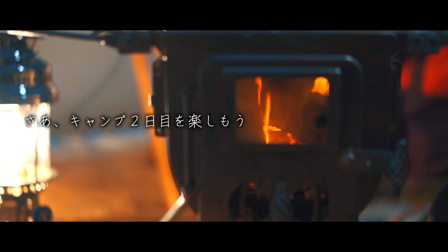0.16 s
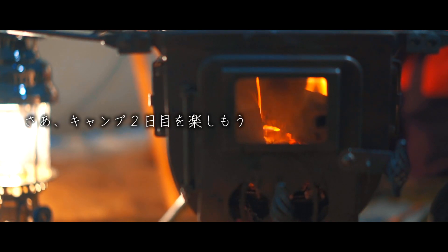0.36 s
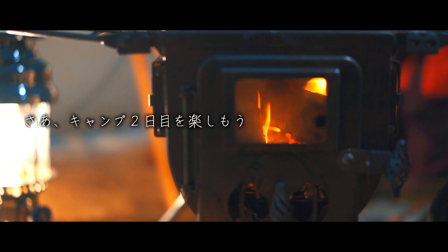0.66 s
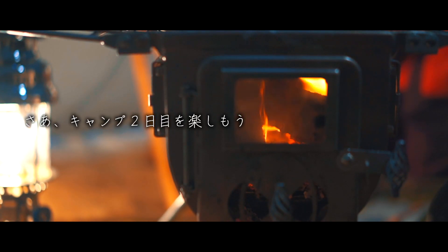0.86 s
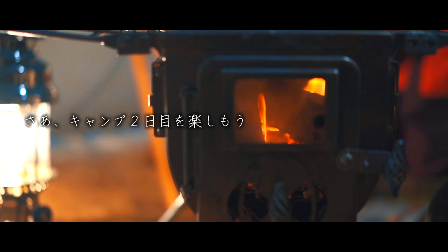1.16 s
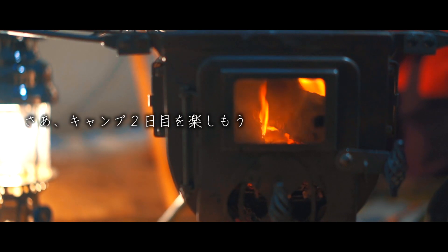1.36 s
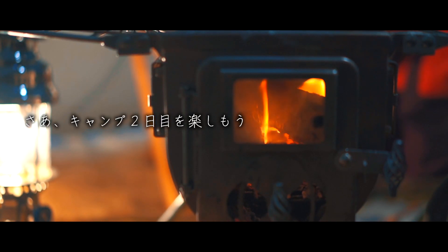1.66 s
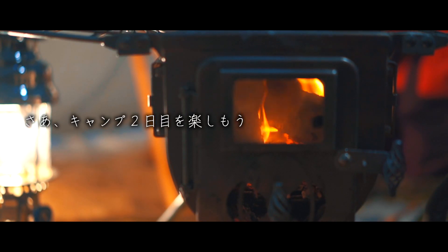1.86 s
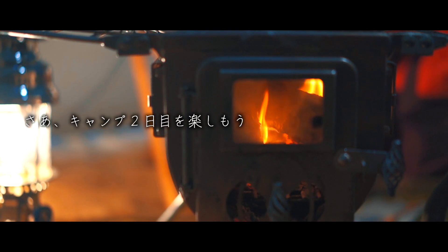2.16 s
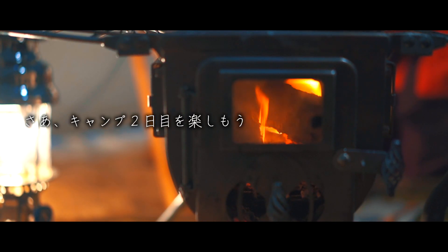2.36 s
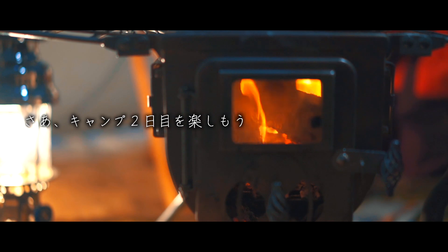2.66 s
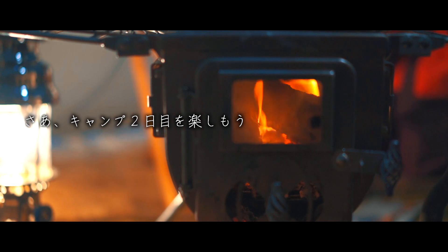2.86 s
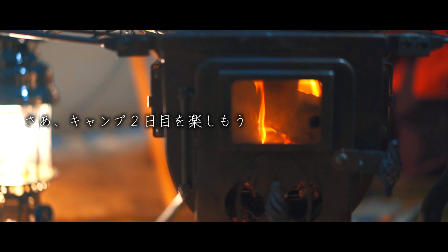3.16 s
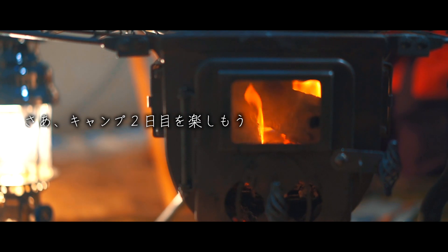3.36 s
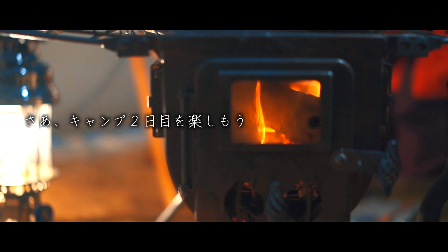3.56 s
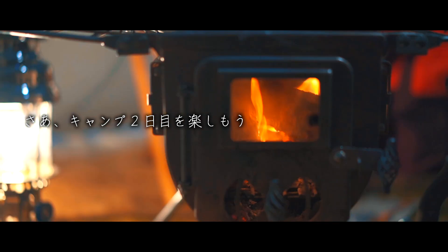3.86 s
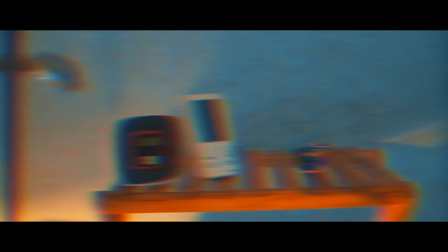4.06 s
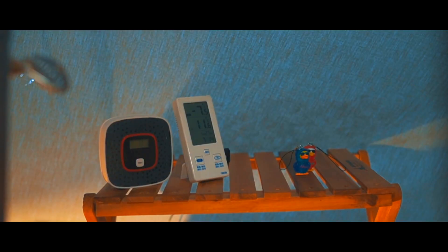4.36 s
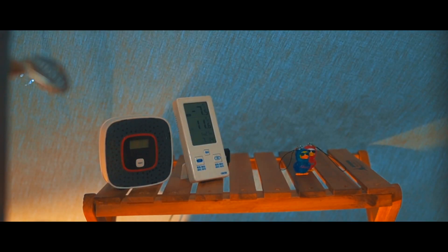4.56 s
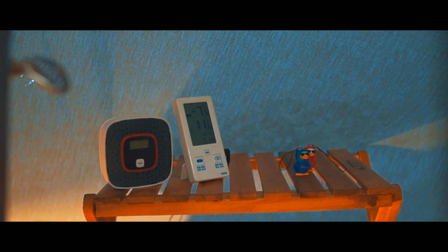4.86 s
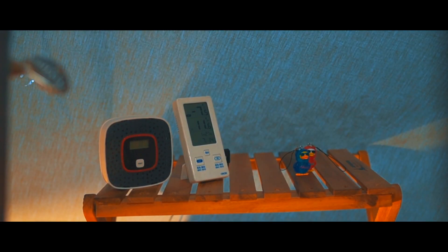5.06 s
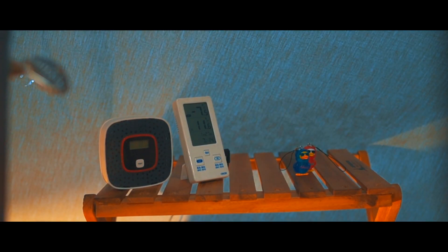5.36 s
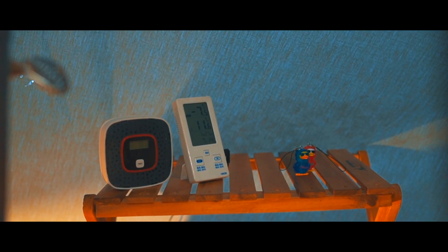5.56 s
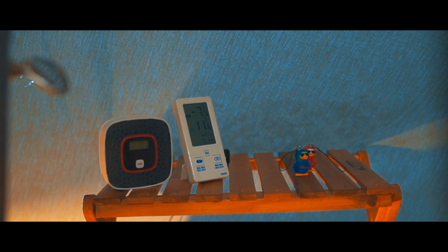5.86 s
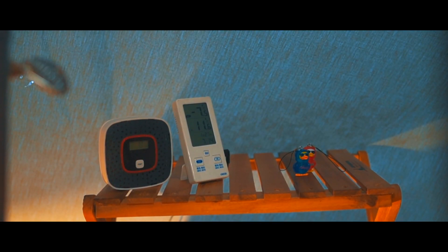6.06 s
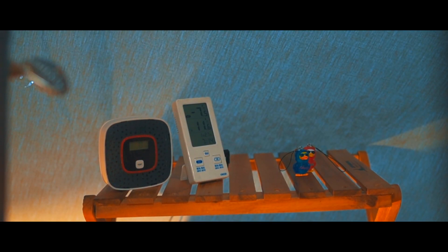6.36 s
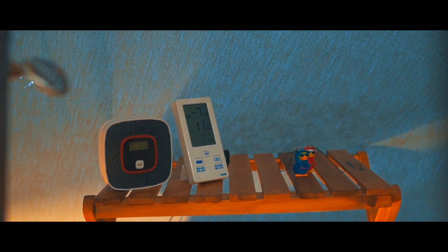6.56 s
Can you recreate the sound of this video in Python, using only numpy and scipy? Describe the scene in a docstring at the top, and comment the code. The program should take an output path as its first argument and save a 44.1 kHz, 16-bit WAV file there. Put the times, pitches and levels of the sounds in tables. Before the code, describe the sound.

Inside a tent, a hand-cranked coffee mill is heard faintly from afar: an even, hissy wash with sparse dry ticks, tiny very high squeaks and one brief squeal early on. At about four seconds the wide distant sound crossfades to a close, centred single microphone, and the grinding becomes loud, rough and rattling, with dense bean cracks until the end. No fire crackle stands out.

```python
"""A hand mill grinds coffee beans inside a tent, first heard from afar by a pair of microphones,
then close by through one. The burrs' crushing force is noise in bands, passed through the mill's resonances:
a rumbling body, rattling grit above it, and short bursts where beans crack.
The crank's axle squeaks very high as a wavering tone; one lower, louder squeal is two beating tones."""
import sys
import numpy as np
from scipy import signal
from scipy.fft import rfft, irfft
from scipy.io import wavfile

SR = 44100
rng = np.random.default_rng(int(sys.argv[2]) if len(sys.argv) > 2 else 0)


def amplitude_ratio(level_db):
    """Convert a level in decibels to the matching linear amplitude (field) ratio."""
    exponent = np.asarray(level_db, float) / 20
    return 10 ** exponent


def materialize(psi):
    """Save the field psi as 16-bit PCM at rate SR to the path in sys.argv[1].

    A 1-D psi becomes a single channel; in a 2-D psi each row is a channel.
    """
    bounded = np.clip(np.atleast_2d(psi).T, -1, 1)
    quanta = np.round(bounded * 32767).astype(np.int16)
    wavfile.write(sys.argv[1], SR, quanta)


N = 295911
MICS_CHANGE_S = 4.0   # cracks before this are heard from afar, those after it close by


def rms_one(x):
    """Scales a signal to an rms of 1."""
    return x / np.sqrt(np.mean(x ** 2) + 1e-20)


def in_time(rows):
    """Draws straight lines between rows of (time [s], value, ..): one curve for each value column."""
    s, *columns = np.transpose(rows)
    return [np.interp(np.arange(N) / SR, s, c) for c in columns]


def at_hz(points, hz, axis=1):
    """Reads a column of a table of (frequency [Hz], level [dB], ..) along log frequency."""
    points = np.array(points)
    return np.interp(np.log(hz), np.log(points[:, 0]), points[:, axis])


def drift(rate_hz):
    """Slow chance: noise at every 20th sample through a double one-pole low-pass; spread 1."""
    r = np.exp(-2 * np.pi * rate_hz * 20 / SR)
    noise = rng.standard_normal(N // 20 + 2002)
    slow = signal.lfilter([1], [1, -2 * r, r * r], noise)[2000:]   # settled part only
    return np.interp(np.arange(N) / 20, np.arange(len(slow)), rms_one(slow))


def shaped(x, db_at, size=8192):
    """Causal (minimum-phase) filter with the response db_at(Hz)."""
    hz = np.maximum(np.arange(size // 2 + 1) * SR / size, 1)
    cepstrum = irfft(np.log(amplitude_ratio(db_at(hz))))
    cepstrum[1:size // 2] *= 2
    cepstrum[size // 2 + 1:] = 0
    impulse = irfft(np.exp(rfft(cepstrum)))
    return signal.fftconvolve(x, impulse)[:N]


def band(x, low_hz, high_hz):
    """Band-pass filter."""
    return signal.sosfilt(signal.butter(3, [low_hz, high_hz], "band", fs=SR, output="sos"), x)


def stick_slip(rows, throb_db, waver_hz):
    """A rubbed metal part sings one tone whose strength throbs and whose pitch wavers."""
    level_db, hz = in_time(rows)
    t = np.arange(N) / SR
    sounding = (t > rows[0][0]) & (t < rows[-1][0])
    throb = rms_one(amplitude_ratio(throb_db * drift(90)))
    phase = 2 * np.pi * np.cumsum(hz + waver_hz * drift(160)) / SR
    return sounding * np.sqrt(2) * amplitude_ratio(level_db) * throb * np.sin(phase)


# axle squeaks, afar and close by:
# (time of full strength [s], level then [dB], length [s], sag over that length [dB])
SQUEAK_ROWS = [(.02, -45, .03, 3), (.1, -49, .01, 2), (.244, -46, .006, 3), (.342, -35, .064, 14),
               (.8, -39, .03, 6), (.896, -40, .008, 3), (1.192, -38, .048, 7), (2.158, -26.5, .018, 1.5),
               (2.595, -29, .01, 3), (3.038, -26, .04, 20), (3.488, -23, .02, 12), (3.545, -50, .01, 2),
               (3.945, -39, .022, -2), (4.724, -33, 0.045, -3), (6.018, -25.5, 0.017, -1),
               (6.124, -37, .015, 9)]


def squeaks():
    """The dry axle sings: each squeak swells quickly, sags while it lasts and dies away into silence."""
    pitch_hz, rise_db_per_s, fall_db_per_s = 14750, 1500, 800
    t = np.arange(0, N / SR + .01, .002)
    each = []
    for s, db, length, sag_db in SQUEAK_ROWS:
        swell = rise_db_per_s * np.maximum(s - t, 0)
        sag = sag_db * np.clip((t - s) / length, 0, 1)
        fall = fall_db_per_s * np.maximum(t - s - length, 0)
        each.append(db - swell - sag - fall)
    rows = np.transpose([t, np.max(each, axis=0), pitch_hz + 0 * t])
    return stick_slip(rows, throb_db=4, waver_hz=45)


# the lower tone of the one squeal, heard from afar: (time [s], level [dB], pitch [Hz])
SQUEAL_ROWS = [(1.302, -57, 7050), (1.307, -31, 7050), (1.321, -26.5, 7400), (1.327, -32, 7200),
               (1.336, -15, 6970), (1.345, -16.5, 6760), (1.359, -28, 6720), (1.375, -41, 6660),
               (1.395, -45, 6770)]


def squeal():
    """Two neighbouring tones beat against each other, in a rasp of noise, with a weak octave."""
    upper_rows = [(s, level_db - 9, hz + 210) for s, level_db, hz in SQUEAL_ROWS]
    lower = stick_slip(SQUEAL_ROWS, throb_db=4, waver_hz=70.7)
    upper = stick_slip(upper_rows, throb_db=1, waver_hz=68.8)
    tone = lower + upper
    level = amplitude_ratio(in_time(SQUEAL_ROWS)[0])
    noise = rms_one(band(rng.standard_normal(N), 5900, 6700))
    rasp = amplitude_ratio(-18) * level * (tone != 0) * noise
    octave = amplitude_ratio(-12) * band(tone ** 2, 12000, 16000)   # squaring doubles the pitch
    return tone + rasp + octave


# beans cracking, afar and then close by: (time [s], peak level [dB], brightest at [Hz],
# narrowness [dB per octave], time to fall by 60 dB [s])
CRACK_ROWS = [(0.153, -26, 8000, 4, 0.024), (.33, -35, 5000, 7, 0.078), (0.597, -23, 7840, 15, 0.031),
              (1.205, -29, 6000, 4, 0.065), (1.305, -27, 4500, 5, 0.12), (1.852, -25, 7000, 1.5, 0.06),
              (1.878, -26, 7000, 2.5, .025), (1.917, -15, 2850, 10, 0.059), (2.1815, -20, 8000, 7, 0.023),
              (2.712, -30, 9000, 4.5, .11), (2.8065, -35, 7000, 4.5, .04), (3.188, -30.5, 9000, 1.5, .043),
              (3.33, -33, 9000, 5, .036), (3.3771, -13, 8000, 3, .018), (3.63, -36, 10000, 3, 0.069),
              (3.795, -34, 5000, 3, 0.058), (4.136, -13.5, 7200, 18, 0.049), (4.3412, -19, 6810, 17, .041),
              (4.4499, -15, 3140, 12, .045), (4.4968, -18, 4590, 8, .041), (4.5178, -12, 6860, 21, .033),
              (4.6145, -15, 3440, 9, .039), (4.6669, -18, 3310, 3, .045), (4.7323, -23, 6970, 5, 0.065),
              (4.852, -17, 6420, 11, 0.038), (5.0131, -17, 3390, 10.5, 0.063),
              (5.078, -31, 4260, 10, 0.027), (5.1184, -13.5, 6980, 15, .05), (5.2526, -23, 6810, 13, 0.063),
              (5.429, -17, 3580, 9, 0.039), (5.495, -13.5, 7200, 21, 0.072), (5.52, -16.5, 3820, 4, 0.069),
              (5.6557, -20, 3340, 9, .065), (5.8217, -22, 3350, -1, 0.08), (5.9335, -23, 7330, 11, 0.031),
              (6.0413, -22, 6890, 17, 0.051), (6.069, -12.5, 3340, 1, 0.035), (6.177, -22, 3070, 1, 0.049),
              (6.189, -24, 3420, 1, 0.028), (6.2259, -20, 3390, 3, 0.05), (6.3125, -15.5, 7160, 15, 0.034),
              (6.4183, -12, 3760, 7, 0.029), (6.4783, -19, 3840, 7, .052), (6.6225, -17, 3000, 7, .045),
              (6.661, -21, 6700, 9.5, .03), (6.6968, -14.5, 7200, 19, 0.03)]


def cracks(near, hz):
    """Envelope of the cracking beans in the band at hz: long crunches swell in, short snaps start almost at once."""
    steeper_above = 7.5   # dB per octave: falls off faster above the brightest pitch than below
    band_under_peak_db = 16   # the brightest band's rms lies this far under a crack's peak
    out, t = np.zeros(N), np.arange(int(.15 * SR)) / SR
    for s, peak_db, top_hz, narrow_db, t60 in CRACK_ROWS:
        if (s > MICS_CHANGE_S) != near:
            continue
        octaves = np.log2(hz / top_hz)
        slope = max(narrow_db + steeper_above * (octaves > 0), 0)
        level_db = peak_db - band_under_peak_db - slope * abs(octaves)
        rise = 0.73 * t60 ** 2
        shape = np.minimum(t / rise, 1) * amplitude_ratio(-60 * np.maximum(t - rise, 0) / t60)
        start = int(s * SR)
        out[start:start + len(t)] += amplitude_ratio(level_db) * shape[:N - start]
    return out


# resonances of the mill: (centre [Hz], width [Hz], lift from afar [dB], lift close by [dB])
RESONANCES = [(64.6, 8.6, 10, -2), (132.6, 23, -7, 6), (320, 81, 4, 3), (573, 70, 1.5, 9.5),
              (821, 56, -9, 5), (990.4, 44, 5, 8.5), (1293, 113, 3, 6), (1486, 120, -1.5, 1),
              (1570, 44, 3, 6.5), (1710, 110, 8.5, 5), (1917, 80, 11, 7.5), (2048, 21, 4, 12),
              (2094, 84, 5.5, -3.5), (2241, 182, 11.5, 0), (2404, 40, 5, 4.5), (3120, 82, 8.5, -7.5),
              (3450, 250, 3, -1.5), (4440, 170, 5, 3), (6980, 1300, 3.5, 8.5), (8840, 1100, 2, -3.5),
              (9800, 300, 7, 4), (10140, 400, 1, 8), (10850, 250, 2, -6), (11430, 1100, 7.5, 7),
              (13200, 950, 6.5, 9.5)]
# broad colour under the resonances: (frequency [Hz], level from afar [dB], level close by [dB])
BROAD_COLOUR = [(60.6, -45, -20.5), (117, -21.5, -14), (263, -17, -5), (394, -17, -7.5), (509, -7.5, -5),
                (1056, 2.5, 1.5), (1520, -5.5, -5.5), (2400, -3, -0.5), (3150, -8, -6), (5030, -12, -14),
                (8000, -13.5, -18), (10700, -17.5, -25.5), (13400, -22, -30.5), (16000, -18.5, -29)]


def mill_db(hz, near):
    """The mill's response: broad colour plus a rounded hump for each resonance."""
    humps = sum(row[2 + near] / (1 + (2 * (hz - row[0]) / row[1]) ** 2) for row in RESONANCES)
    return at_hz(BROAD_COLOUR, hz, axis=1 + near) + humps


def crushing(per_s, spread_db, clump_db, share):
    """Force on the burrs: smooth rubbing plus a share of clumped tiny fractures of uneven size; rms 1."""
    born = rng.random(N) < per_s / SR
    sizes = amplitude_ratio(spread_db * np.minimum(rng.exponential(1, N), 4)) * born
    fractures = signal.lfilter([1], [1, -np.exp(-1 / (0.0012 * SR))], sizes)   # each dies within a few ms
    clumps = amplitude_ratio(clump_db * drift(20))
    return rms_one(1 + share * rms_one(fractures) * clumps)


# bands of the crushing force, one row of band edges [Hz] for each layer:
# rumble, body, grit, burr ring, finest grit
LAYER_EDGES_HZ = [
    [15, 400],
    [400, 750, 1450, 2100, 2900],
    [2900, 4000, 5500, 6300, 7600, 8800],
    [8800, 10700],
    [10700, 12300, 14000, 17000],
]


def grinding(near, envelopes, patchy_db, patch_rate_hz):
    """Noise under five envelopes, each band swelling a little on its own, plus cracks, through the resonances."""
    def colour(hz):
        """The mill's response at this distance."""
        return mill_db(hz, near)

    def passed(low_hz, high_hz):
        """Rms that the colour lets through from unit noise in this range."""
        return np.sqrt(np.sum(amplitude_ratio(2 * colour(np.arange(low_hz, high_hz)))) / (SR / 2))

    force = 0
    for edges, envelope, depth_db in zip(LAYER_EDGES_HZ, envelopes, patchy_db):
        for low_hz, high_hz in zip(edges, edges[1:]):
            patches = rms_one(amplitude_ratio(depth_db * drift(patch_rate_hz)))
            steady = envelope * patches / passed(edges[0], edges[-1])
            sudden = cracks(near, np.sqrt(low_hz * high_hz)) / passed(low_hz, high_hz)
            force = force + band(rng.standard_normal(N) * (steady + sudden), low_hz, high_hz)
    return shaped(force, colour)


# far pair, side against mid: (frequency [Hz], level [dB])
FAR_SIDE = [(60, -15), (110, -23), (200, -20), (380, -16.5), (700, -9), (1290, -5), (2380, -3.5),
            (4400, 1.5), (8120, -1), (15000, 1)]
# far pair, left over right: (frequency [Hz], level [dB])
FAR_BALANCE = [(60, 3), (110, -2), (200, 0), (380, 1), (700, -1.5), (1290, -1), (2380, -2), (4400, 1.5),
               (8120, -3.5), (15000, 5)]


def mill_far():
    """Even grinding; mid and side share the crushing but not the waveform: the tent scatters the sound."""
    body = amplitude_ratio(-35) * crushing(600, spread_db=1.5, clump_db=5, share=0.13)
    grit = amplitude_ratio(-47) * crushing(170, spread_db=8, clump_db=7.5, share=0.14)
    rumble = body * amplitude_ratio(-27.5)   # little rumble carries that far
    # up here mostly the steady hiss of the microphones
    ring, fine = amplitude_ratio(-53), amplitude_ratio(-50)
    envelopes = [rumble, body, grit, ring, fine]
    mid, side = [grinding(0, envelopes, patchy_db=(0.58, 0.96, 0.7, .4, .4), patch_rate_hz=9.7)
                 for _ in range(2)]
    side = shaped(side, lambda hz: at_hz(FAR_SIDE, hz))
    left = shaped(mid + side, lambda hz: at_hz(FAR_BALANCE, hz) / 2)
    right = shaped(mid - side, lambda hz: -at_hz(FAR_BALANCE, hz) / 2)
    return np.array([left, right])


# a whole bean catches in the burrs, close by: (time [s], lift [dB], build-up [s], release [s])
CATCH_ROWS = [(4.52, 2.5, 0.11, 0.041), (4.74, 1, .03, .04), (4.88, 3.5, 0.023, 0.038),
              (5.03, 3, 0.1, 0.0082), (5.33, 3.5, .08, 0.022), (5.52, 3, 0.027, 0.035),
              (5.76, 4, .03, .025), (5.826, 3.5, 0.061, .05), (6.19, 8, 0.024, 0.017),
              (6.56, 3.5, 0.15, 0.091)]


def catches():
    """Extra load in dB: it builds up until the bean gives way, then falls back."""
    t = np.arange(N) / SR
    return sum(np.interp(t, [s - build, s, s + release], [0, lift_db, 0])
               for s, lift_db, build, release in CATCH_ROWS)


# the hand at the crank, close by: (time [s], load on the burrs as body level [dB],
# change from loss of speed [dB])
HAND = [(3.9, -51, 0), (4.0, -35, -1), (4.09, -29, 0), (4.28, -24, 0), (4.4, -25, 0.5), (4.62, -23.5, -0.5),
        (4.92, -24, 0), (5.08, -24, 0), (5.22, -25, -0.5), (5.4, -23, -0.5), (5.6, -23.5, -1),
        (5.9, -24, -2.5), (6.1, -24, -0.5), (6.26, -24.5, -7), (6.36, -25, -7.5), (6.5, -24.5, -7),
        (6.71, -25.5, -10)]


def mill_near():
    """Load and speed of the hand drive each layer; close by, the fractures stand out more than from afar."""
    load_db, slower_db = in_time(HAND)
    caught_db = catches()

    def layer(under_body_db, speed_share, catch_share):
        """Envelope that takes a share of the speed loss and of the catches."""
        return amplitude_ratio(load_db + under_body_db + speed_share * slower_db + catch_share * caught_db)

    rumble = layer(-14, 0.5, .2)
    body = layer(0, 0, 1)
    grit = layer(-10, 0.31, 0.89)
    ring = layer(-19, 0.7, .2)
    fine = layer(-18.5, 1.4, .2)
    force = crushing(300, spread_db=0.5, clump_db=5, share=0.93)
    # the exponents set how strongly each layer follows the fractures, the grit most of all
    steady = [rumble, body * force ** 0.31, grit * force ** 0.5, ring * force ** 0.098, fine * force ** 0.15]
    started = np.arange(N) > HAND[0][0] * SR
    return grinding(1, started * steady, patchy_db=(0.96, 1.1, 1.9, 0.99, 1), patch_rate_hz=17.5)


# the far microphones fade out: (time [s], gain [factor])
FAR_FADE = [(3.93, 1), (4.0, .72), (4.1, .33), (4.18, 0)]


def scene():
    """The far pair hears mill, squeal and axle until it fades; the close microphone feeds both sides alike."""
    fade, = in_time(FAR_FADE)
    axle = squeaks()
    left_over_right_db = 7.5
    pan = amplitude_ratio(np.array([[1], [-1]]) * left_over_right_db / 2)
    pan = pan / np.mean(pan)
    axle_far = pan * [axle, np.roll(axle, shift=1)]   # it reaches the right microphone a sample late
    squeal_far = np.array([squeal(), squeal() * amplitude_ratio(4)])   # the two microphones hear it unlike
    far = fade * (mill_far() + squeal_far)
    return far + np.where(fade > 0, axle_far, axle) + mill_near()


def top_cut(x):
    """Nothing passes above the cut-off."""
    return signal.sosfilt(signal.butter(12, 16650, fs=SR, output="sos"), x)


def record(dry):
    """The microphones lose the deep bass, and the top is cut steeply."""
    thin = signal.sosfilt(signal.butter(2, 55, "high", fs=SR, output="sos"), dry)
    cut = signal.sosfilt(signal.ellip(10, .5, 60, 15650, fs=SR, output="sos"), thin)
    return top_cut(cut)


dry = scene()
out = record(dry)
materialize(out)
```